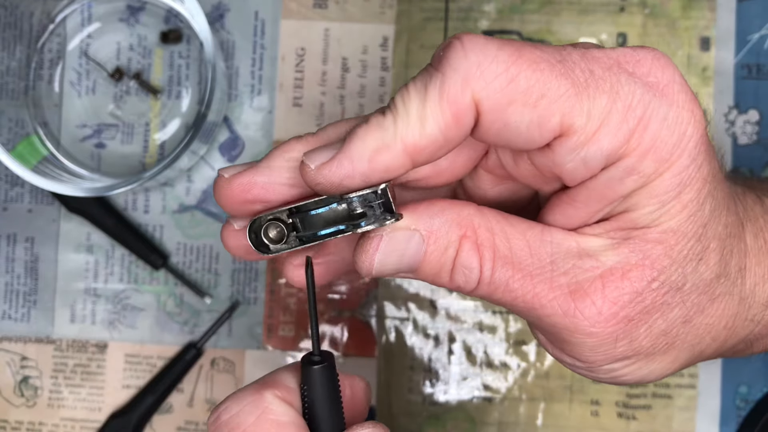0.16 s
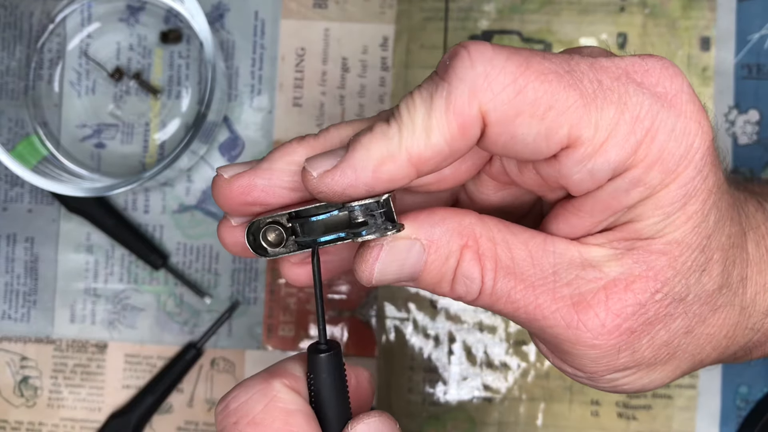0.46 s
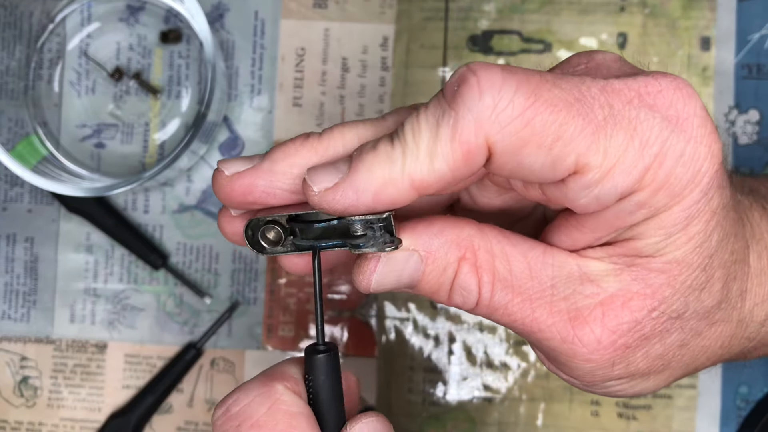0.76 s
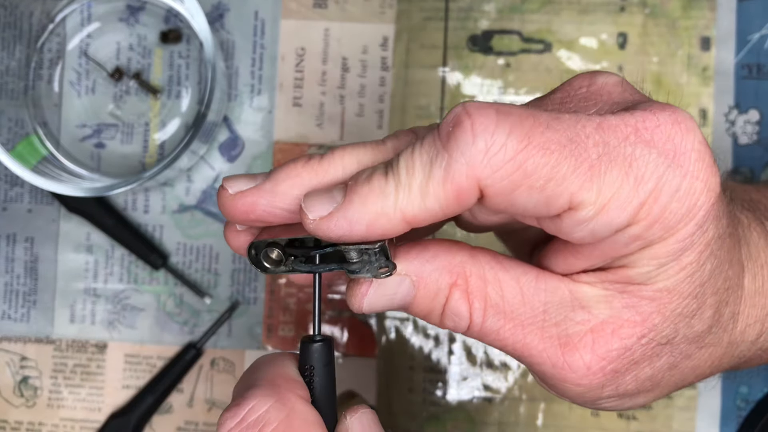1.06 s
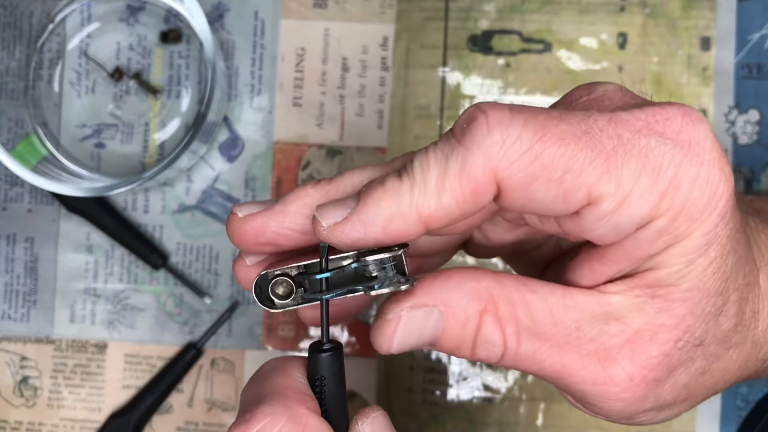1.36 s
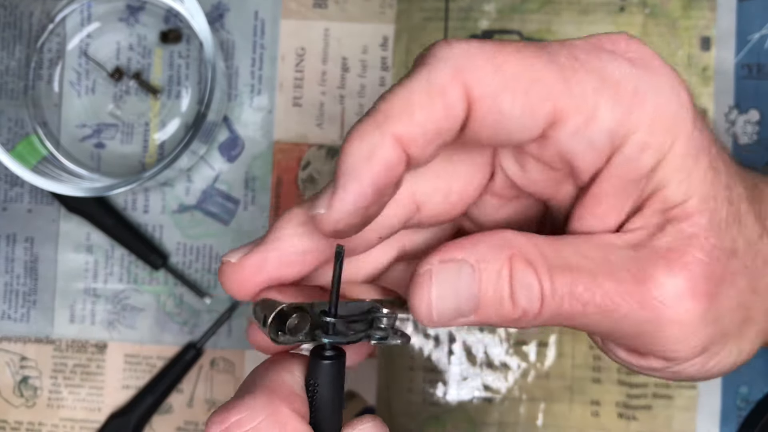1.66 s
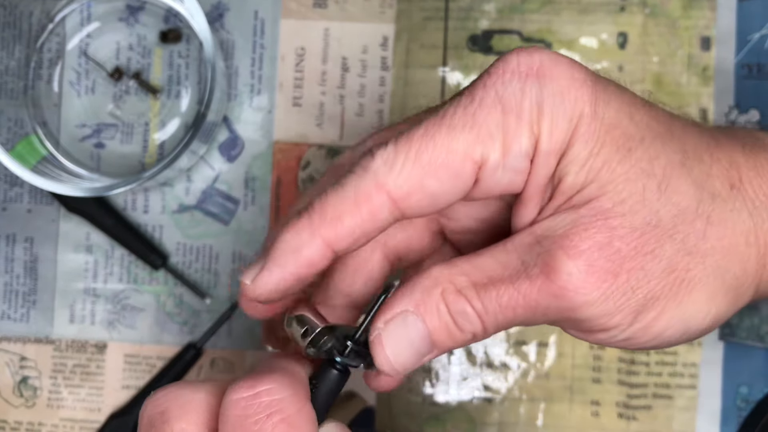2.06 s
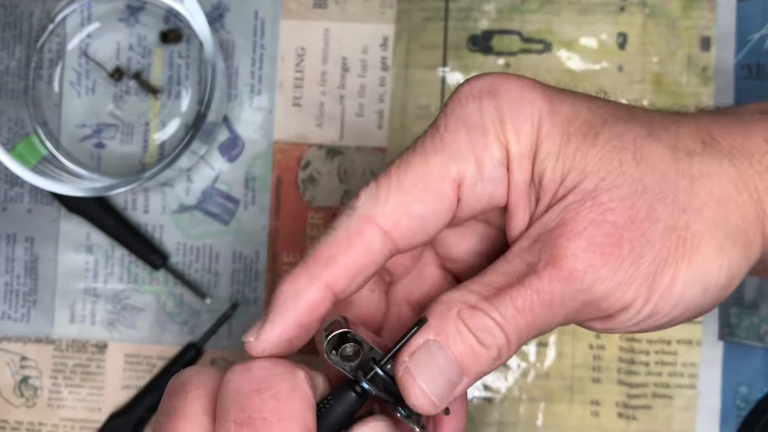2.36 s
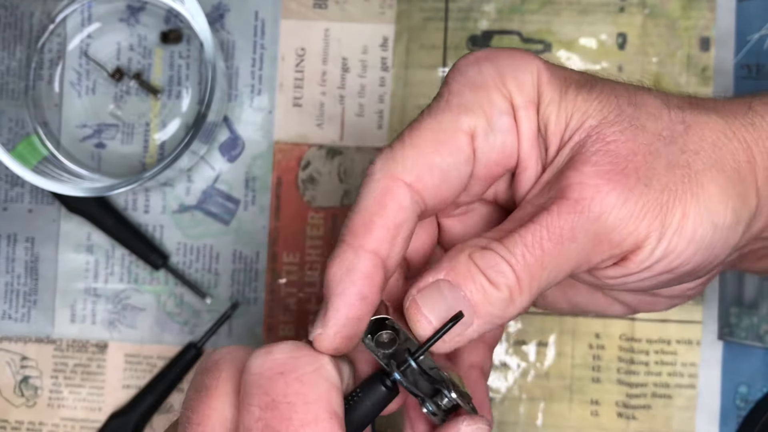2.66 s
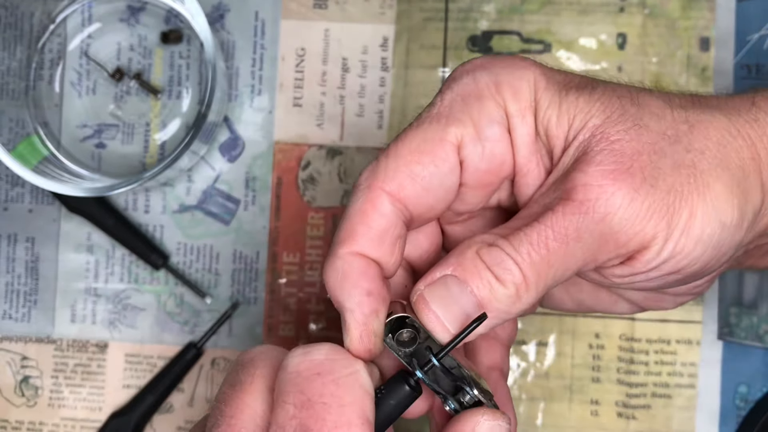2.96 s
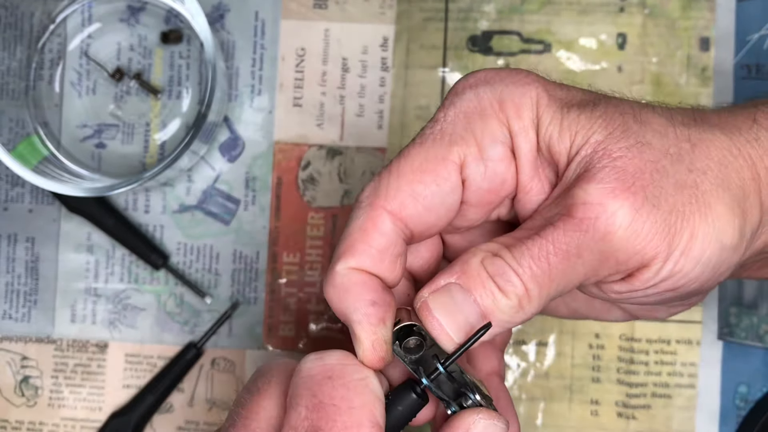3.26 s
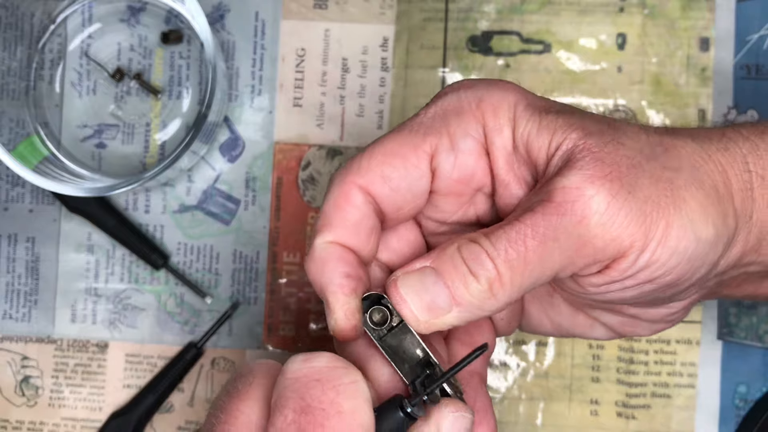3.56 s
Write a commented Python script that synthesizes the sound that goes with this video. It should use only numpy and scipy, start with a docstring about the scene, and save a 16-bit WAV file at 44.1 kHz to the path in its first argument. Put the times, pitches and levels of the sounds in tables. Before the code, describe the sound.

Close up in a quiet indoor room, a screwdriver tip ticks and scratches on small metal parts, clicks harder once, goes almost still, then a part snaps loudly over a faint dull knock.

```python
"""A small screwdriver in a little steel mechanism, held over a table close to the microphone in a quiet room.
The tip ticks and scrapes, then a part snaps loudly; every contact rings the same short steel modes.
At the snap and its rebound dull knocks pass through hands and table, as short damped sines.
The table sends one early echo and, with the hands, a dense answer; the room answers with decaying noise.
Behind it: steady room air and a faint low drone that swells, both filtered noise."""
import sys
import numpy as np
from scipy import signal
from scipy.fft import rfft, irfft, next_fast_len
from scipy.io import wavfile
from scipy.ndimage import map_coordinates

SR = 44100
rng = np.random.default_rng(int(sys.argv[2]) if len(sys.argv) > 2 else 0)


def store_wav(level_fs):
    """Save 16-bit WAV to argv[1]."""
    pcm = np.round(np.clip(np.atleast_2d(level_fs), -1, 1) * 32767)
    wavfile.write(sys.argv[1], SR, pcm.T.astype(np.int16))


N = 163170  # samples, 3.7 s

# Ringing modes of the steel mechanism: f/Hz, relative level/dB, t60/s
STEEL_MODES = [(1420, -4, 0.003), (1790, -16, 0.014), (2250, -19, 0.0066), (2730, -4, 0.014),
               (3120, -2.5, 0.0098), (3312, -1, 0.013), (3690, -1, 0.014), (3930, 5, 0.0082),
               (4380, -8.5, 0.0036), (5130, 0, 0.0053), (5560, -0.5, 0.014), (5820, -2, 0.018),
               (6230, 4.5, 0.015), (6656, 3, 0.014), (6854, 0, 0.018), (7174, 1, 0.014),
               (7530, -0.5, 0.027), (8120, 5, 0.017), (8645, 4.5, 0.019), (8850, -4.5, 0.022),
               (9200, 1, 0.015), (10500, 3, 0.01), (10930, 2, 0.0094), (11600, -1, 0.0064),
               (11730, 9, 0.0063), (13650, -0.5, 0.0091), (13700, -5, .007), (15350, -6, 0.007)]
ATTACK_S, RADIATES_HZ = 0.00022, 600  # softening of each onset; bass falls away below this corner
SCATTER_DB = 2  # random spread of each mode at each contact
BLOW_PHASE_SPREAD = 0.7  # radians between the modes at a blow


def mechanism():
    """All contacts ring the modes, blows nearly in step, friction at random; so small a thing radiates no bass."""
    drive = np.zeros((N, len(STEEL_MODES)), complex)
    for (s, gain), spread in ((blows(), BLOW_PHASE_SPREAD), (scrapes(), 2 * np.pi)):
        chance = rng.standard_normal((len(s), 2, len(STEEL_MODES)))
        scatter = amp(SCATTER_DB * chance[:, 0])
        phase = spread * chance[:, 1] - np.pi / 2
        pushes = gain.T * scatter * np.exp(1j * phase)
        np.add.at(drive, (s * SR).astype(int), pushes)

    ringing = 0
    onset = np.exp(-1 / (ATTACK_S * SR))
    for push, (hz, _, t60) in zip(np.ascontiguousarray(drive.T), STEEL_MODES):
        decay = amp(-60 / (t60 * SR))
        pole = decay * np.exp(2j * np.pi * hz / SR)
        # the second, faster pole makes the mode rise over the attack time
        mode = signal.lfilter([1 - onset], np.poly([pole, pole * onset]), push)
        ringing = ringing + mode.real
    return filtered(ringing, lambda hz: (1j * hz / (RADIATES_HZ + 1j * hz)) ** 2)


# Ticks of the tip on the parts: t/s, level/dB, favoured f/Hz, low modes level/dB, high modes level/dB,
# favoured low f/Hz
TIP_TICKS = [(0.0187, -38.5, 7850, -33, -8.5, 3800), (.402, -34.5, 7000, -12, -14, 3800),
             (0.5173, -39, 7500, -9, -8.5, 3940), (0.5713, -44.5, 8360, -12, -13, 3800),
             (0.5932, -34, 7050, -10, -13.5, 3850), (.699, -56, 7100, -8, -8, 3800),
             (0.8363, -54.5, 6240, -1, -6.5, 2800), (.911, -49, 7900, -7, -21, 3000),
             (0.9428, -47, 8200, -4, -14, 3300), (.965, -45, 8300, -12, -7, 3700),
             (.989, -51, 8000, -10, 0, 3400), (1.003, -52, 7950, -12, -10, 3700),
             (1.0638, -49, 7900, -16, -14, 3700), (1.091, -48, 7400, 1, -9, 3850),
             (1.1204, -44, 7700, -6, -8, 3500), (1.138, -47.5, 7700, -8, -12, 3700),
             (1.149, -42, 7800, 4, -14, 3800), (1.159, -40, 8400, 4, -15, 3920),
             (1.165, -46, 8000, -9, 2, 4300), (1.2687, -46.5, 7000, -16, -15, 3800),
             (1.356, -48, 7970, -10, -13, 3800), (1.468, -47, 7950, -12, -15, 3500),
             (1.5227, -57.5, 6700, 23.5, -13, 3680), (1.54, -23.5, 6750, -10, -8, 3600),
             (1.552, -40, 6660, -6, -12, 3600), (1.5587, -45, 6700, -12, -5, 3600),
             (1.565, -41, 6700, -9, -14, 3600), (1.694, -40, 8300, 2.5, -5, 3600),
             (1.695, -40.5, 5100, -15, -12, 4400), (1.747, -40.5, 7460, -5, -15, 3900),
             (1.75, -51, 7560, -15, -12, 3900), (1.771, -43, 7300, -11, -10, 3800),
             (2.3708, -46.5, 7500, -19, -6, 3800), (2.5063, -48.5, 6000, -5, -3, 3600),
             (2.522, -51.5, 7300, 9, -4, 3460)]
# Contacts of the snapping part and its rebound: the same columns
SNAP_CONTACTS = [(3.2812, -29, 5430, -7, -22, 3000), (3.2822, -12, 7100, -13, -13, 3270),
                 (3.2833, -15, 7100, -14, -6.5, 2820), (3.284, -16.5, 8600, -24, -3.5, 3300),
                 (3.2849, -17.5, 6940, 7, -10, 3330), (3.2863, -2, 6640, -15.5, -36, 3930),
                 (3.2895, -22.5, 6800, 6, -8, 3100), (3.3325, -37, 5100, 6, -7, 3860)]
FAR_DB, SNAP_FAR_DB = 8, 12.5  # largest loss away from the favoured modes: usual, and in the snap
LOW_FOCUS_DB = 25  # loss per squared kHz among the low modes of a blow


def blows():
    """Single contacts, each pushing the modes once near its favoured frequencies: times and gain per mode."""
    s, db, *place = np.transpose(TIP_TICKS + SNAP_CONTACTS)
    far_db = np.repeat([FAR_DB, SNAP_FAR_DB], [len(TIP_TICKS), len(SNAP_CONTACTS)])
    return s, amp(db) * shares(*place, LOW_FOCUS_DB, far_db)


# Strokes of the tip, one list each: t/s, level/dB, low modes level/dB, high modes level/dB, favoured f/Hz
TIP_STROKES = [
    [(0.62, -66, -6, -8, 6660), (0.642, -83, 4, -5, 6690), (0.662, -82, -6, -20, 6730),
     (0.682, -69, -14, 0, 6900), (0.706, -75, -2, -17, 7200), (0.742, -91, 8, 2, 7090),
     (0.75, -74, -3, -4, 7020)],
    [(0.87, -77, -4, -4, 7600), (0.878, -80, 5, 1, 7880), (0.906, -57, -11, -21, 7600),
     (0.928, -57, -8, -15, 7840), (0.938, -55, -4, -11, 7900), (0.97, -55.5, -11, -12, 7840),
     (1.006, -51, -15, -14, 7740), (1.04, -69, -11, -20, 7550)],
    [(1.04, -62, -7, -12, 8100), (1.068, -52, -20, -18, 7940), (1.088, -63, 2, -8, 7820),
     (1.112, -76, -22, -11, 7790)],
    [(1.118, -64, 3, -13, 7700), (1.136, -49.5, -6, -16, 7900), (1.15, -52.5, 5, -15, 7990),
     (1.164, -50, -3, -11, 8070), (1.178, -62, 1, -1, 7900), (1.22, -82, -10, -16, 8140),
     (1.25, -65, -5, -5, 8300)],
    [(1.3, -74, -14, -1, 7680), (1.35, -63.5, -3, -8, 7650), (1.358, -58, -12, -15, 7700),
     (1.374, -68, -14, -1, 7640), (1.388, -67, -22, -15, 7500), (1.412, -79, 2, -16, 7440),
     (1.42, -74, -7, -4, 7410)],
    [(1.46, -78, -6, -14, 7630), (1.468, -62, -6, -17, 7550), (1.5, -49.5, -23, -10, 7700),
     (1.518, -43, -25, -21, 7900), (1.524, -47, -20, -17, 7800), (1.534, -49, -3, -18, 7660)],
    [(1.585, -67, 2, -16, 6810), (1.611, -70, -7, -15, 6890), (1.625, -59, -3, -10, 6850),
     (1.651, -72, 0, -25, 7040), (1.671, -73, -11, -11, 7310), (1.688, -65, -1, -12, 7340)],
    [(1.71, -62, 0, -20, 7350), (1.724, -73, -2, -14, 7420), (1.742, -65, 1, -9, 7590)],
    [(1.785, -71, 3, -10, 7530), (1.813, -68, -3, -12, 7160), (1.825, -69, 3, -24, 7180),
     (1.849, -75, 3, -20, 7260), (1.86, -63.5, -1, 0, 7350)],
    [(2.46, -82, -10, -4, 6990), (2.474, -67.5, -13, -2, 7020), (2.512, -70, -12, -3, 7400),
     (2.526, -67, -3, -10, 7460), (2.53, -69, 2, -11, 7350)],
]
GRAINS_PER_S, GRAIN_SPREAD_DB, CLUMP_DB = 3500, 3.5, 2.5


def scrapes():
    """Friction as dense clumped grains, heard only within the strokes: times and gain per mode."""
    s = np.sort(rng.uniform(0, N / SR, int(GRAINS_PER_S * N / SR)))
    clumps_db = CLUMP_DB * wobble(150)[(s * SR).astype(int)]
    size = amp(GRAIN_SPREAD_DB * rng.standard_normal(len(s)) + clumps_db)
    # effective ring time, so that overlapping grains keep the stroke's level
    ring_s = np.mean([t60 for *_, t60 in STEEL_MODES]) / (4 * np.log(1000))
    gain = 0
    for stroke in TIP_STROKES:
        t, *columns = np.transpose(stroke)
        db, low_db, high_db, hz = [np.interp(s, t, c) for c in columns]
        touching = (s >= t[0]) & (s < t[-1])
        gain = gain + touching * amp(db) * shares(hz, low_db, high_db)
    return s, gain * unit(size) / np.sqrt(GRAINS_PER_S * ring_s)


LOW_HZ, HIGH_HZ = 4700, 10000  # low modes lie below, high modes above
FOCUS_DB = 7.5  # loss per squared kHz away from the favoured frequency


def shares(favoured_hz, low_db, high_db, low_hz=0, low_focus_db=0, far_db=FAR_DB):
    """How strongly each contact (column) drives each mode (row); the middle modes have power 1."""
    hz, db, _ = np.transpose(STEEL_MODES)[:, :, None]
    middle_loss = np.minimum(FOCUS_DB * ((hz - favoured_hz) / 1000) ** 2, far_db)
    low_loss = np.minimum(low_focus_db * ((hz - low_hz) / 1000) ** 2, FAR_DB)
    upper_db = np.where(hz > HIGH_HZ, high_db, -middle_loss)
    gain = amp(db + np.where(hz < LOW_HZ, low_db - low_loss, upper_db))
    middle = (hz > LOW_HZ) * (hz < HIGH_HZ)
    return gain / np.linalg.norm(gain * middle, axis=0)


# Dull knocks through hands and table at the snap and its rebound: t/s, f/Hz, starting level/dB, t60/s
KNOCKS = [(3.2828, 171, -44, 0.04), (3.2823, 90, -42, 0.067), (3.285, 1764, -40.5, 0.049),
          (3.287, 1420, -37, 0.017), (3.2835, 540, -42.5, 0.013), (3.286, 48.7, -41.5, 0.11),
          (3.296, 26, -51, 0.21), (3.3322, 1900, -45.5, 0.021), (3.3313, 1400, -36, 0.0067),
          (3.3322, 424, -47, .015)]


def thump():
    """Short pushes, each a sine that starts at its knock and dies away exponentially."""
    total = 0
    for s, hz, db, t60 in KNOCKS:
        after = np.maximum(np.arange(N) / SR - s, 0)
        total = total + amp(db - 60 * after / t60) * np.sin(2 * np.pi * hz * after)
    return total


ECHO_S, ECHO_DB = 0.0018, -13.5  # the echo's delay and level against the direct sound
NEAR_DB, NEAR_T60_S = -12.5, 0.2  # dense answer of hands and table top, in all bands


def table(x):
    """The direct sound with one early echo, and a dense decaying-noise answer of table top and hands."""
    t = np.arange(SR // 4) / SR
    answer = rng.standard_normal(len(t)) * amp(-60 * t / NEAR_T60_S) * (t > ECHO_S)
    dense = amp(NEAR_DB) * signal.fftconvolve(x, answer / np.linalg.norm(answer))[:N]
    direct_and_echo = filtered(x, lambda hz: 1 + amp(ECHO_DB) * np.exp(-2j * np.pi * hz * ECHO_S))
    return dense + direct_and_echo


# Decay of the quiet room: f/Hz, t60/s
ROOM_DECAY = [(200, 0.47), (1000, 0.67), (2000, 0.72), (3000, 0.88), (4500, 0.78), (6500, 0.77), (9500, 1),
              (11000, 0.24), (15000, .33)]
# Stereo width of the room's answer once grown, side against mid: f/Hz, level/dB
ROOM_WIDTH = [(1300, 3.5), (2400, -8), (4400, -7), (8000, -2), (9900, 0.5), (10500, -16), (13000, -11)]
ROOM_DB, ROOM_DELAY_S = -15.5, 0.0037
SIDE_GROWS_S = 0.082  # the answer widens over this time


def room(x):
    """Mid and side of the room's answer: noise tails in which each frequency dies at its own speed."""
    hz, t, z = signal.stft(rng.standard_normal((2, SR)), SR, nperseg=256)
    decay = amp(-60 * t / along(ROOM_DECAY, hz)[:, None])
    tail = signal.istft(z * decay, SR, nperseg=256)[1]
    tail_s = np.arange(tail.shape[1]) / SR
    tail[1] *= 1 - np.exp(-(tail_s / SIDE_GROWS_S) ** 2)
    tail = tail / np.linalg.norm(tail[0])
    delayed = np.pad(x, (int(ROOM_DELAY_S * SR), 0))
    mid, side = signal.fftconvolve(delayed[None], tail, axes=1)[:, :N]
    side = filtered(side, lambda f: amp(along(ROOM_WIDTH, f)))
    return amp(ROOM_DB) * np.array([mid, side])


# Spectrum of the room air: f/Hz, relative level/dB
AIR_SPECTRUM = [(12, -37.5), (20, 8), (43, -1.5), (88, -7.5), (301, -4.5), (558, -12.5), (624, -12.5),
                (1150, -16), (2670, -18), (3070, -18), (9950, -22), (16000, -30.5)]
# Stereo width of the steady background noise, side against mid: f/Hz, level/dB
BACKGROUND_WIDTH = [(60, -20.5), (110, -18), (200, -20.5), (380, -19), (700, -19), (1290, -43), (2380, -47),
                    (4400, -52), (8120, -43), (15000, -33)]
AIR_DB = -62.5


def air():
    """Steady room air in the mid, and a second noise of the same spectrum, turned down by band, in the side."""
    noises = rng.standard_normal((2, N))
    mid, side = [amp(AIR_DB) * unit(filtered(x, lambda hz: amp(along(AIR_SPECTRUM, hz)))) for x in noises]
    return np.array([mid, filtered(side, lambda hz: amp(along(BACKGROUND_WIDTH, hz)))])


# Swells of the drone, before its random wobble: t/s, level/dB
DRONE_SWELLS = [(0.05, -69), (0.08, -76), (0.48, -69.5), (0.55, -76), (0.7, -62.5), (1.25, -75.5),
                (1.38, -67.5), (1.47, -67), (1.56, -61.5), (1.72, -61.5), (2.2, -66), (2.36, -72),
                (3.2, -66.5)]
# Spectrum of the drone: f/Hz, relative level/dB
DRONE_SPECTRUM = [(150, -32), (240, -8), (305, -6), (322, -3), (333, 1.5), (345, -4.5), (480, -10),
                  (750, -17.5), (1200, -25), (2600, -39.5), (2690, -11), (2780, -48)]


def drone():
    """Faint low drone: band-shaped noise whose level swells and wobbles at random."""
    s, db = np.transpose(DRONE_SWELLS)
    level_db = np.interp(np.arange(N) / SR, s, db) + 2.3 * wobble(8.19)
    hum = filtered(rng.standard_normal(N), lambda hz: amp(along(DRONE_SPECTRUM, hz)))
    return amp(level_db) * unit(hum)


def amp(db):
    """Decibels to amplitude."""
    return 10 ** (np.asarray(db) / 20)


def unit(x):
    """x scaled to an RMS of 1."""
    return x / np.sqrt(np.mean(x ** 2) + 1e-20)


def along(points, hz):
    """Values at hz between (f/Hz, value) points on a log axis."""
    f, v = np.transpose(points)
    return np.interp(np.log(hz + 1), np.log(f + 1), v)


def wobble(rate):
    """A smooth random curve with rate knots a second."""
    knots = rng.standard_normal(int(N * rate / SR) + 4)
    return map_coordinates(knots, [np.arange(N) * rate / SR])


def filtered(x, response):
    """x times a response of frequency, zero-padded by at least half a second."""
    m = next_fast_len(N + SR // 2)
    return irfft(rfft(x, m) * response(np.fft.rfftfreq(m, 1 / SR)), m)[..., :N]


def scene():
    """Mechanism and knocks close by, answered by table and room, over air and drone; left and right."""
    near = mechanism() + thump()
    mid, side = room(near) + air()
    mid = mid + drone() + table(near)
    return np.array([mid + side, mid - side])


TOP_HZ = 16000


def record(dry):
    """Both channels are band-limited: nothing passes from the top frequency up."""
    return filtered(dry, lambda hz: hz < TOP_HZ)


dry = scene()
out = record(dry)
store_wav(out)
```